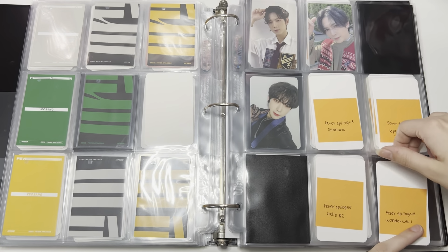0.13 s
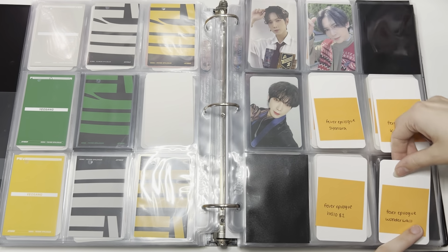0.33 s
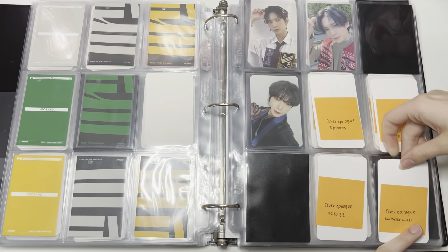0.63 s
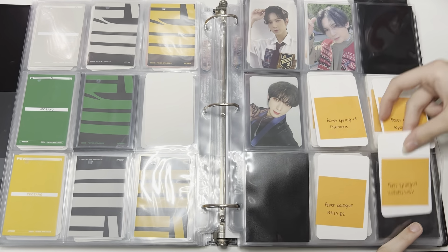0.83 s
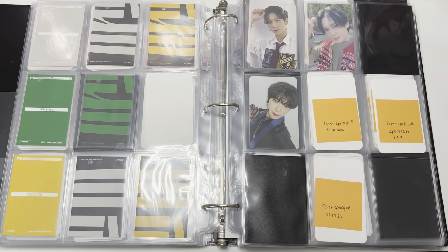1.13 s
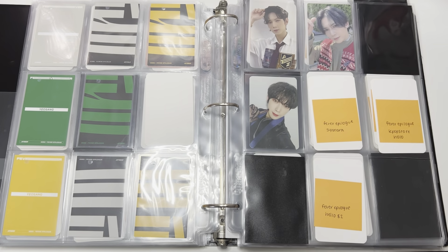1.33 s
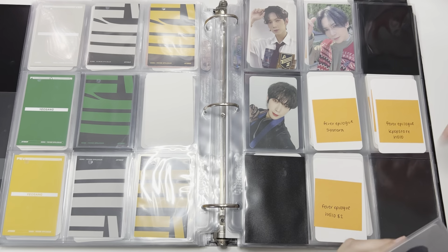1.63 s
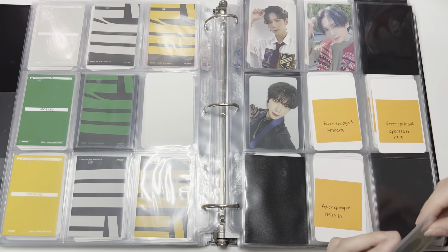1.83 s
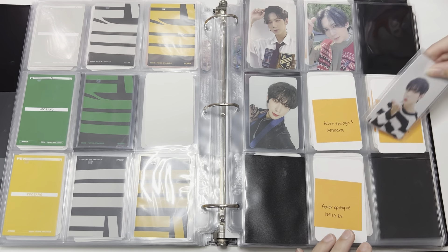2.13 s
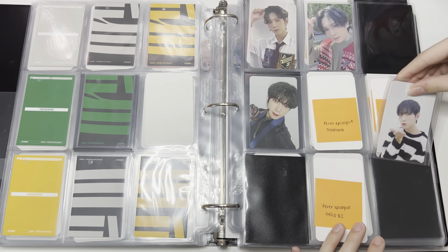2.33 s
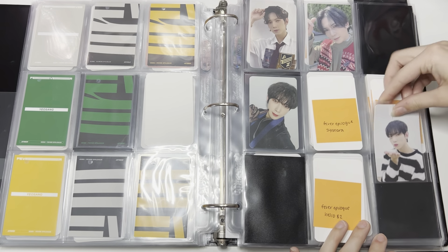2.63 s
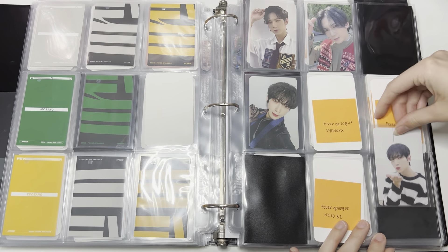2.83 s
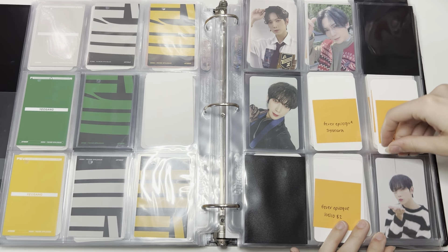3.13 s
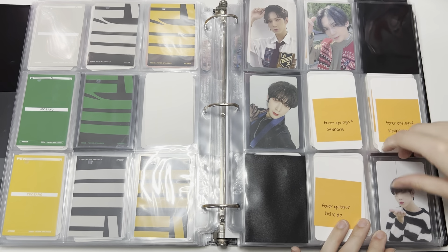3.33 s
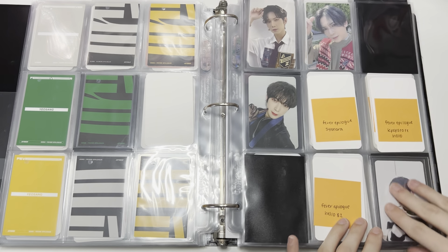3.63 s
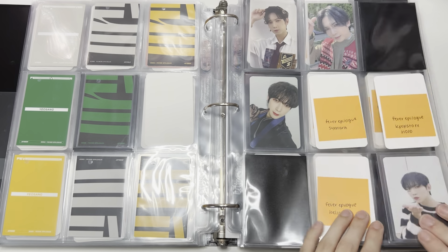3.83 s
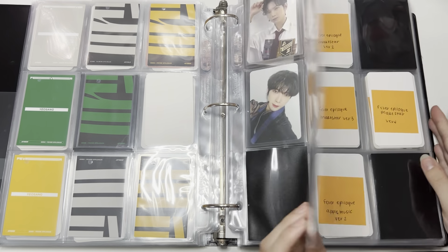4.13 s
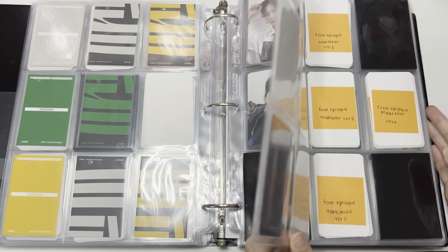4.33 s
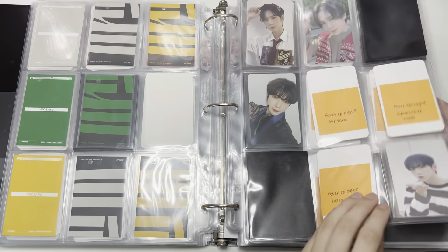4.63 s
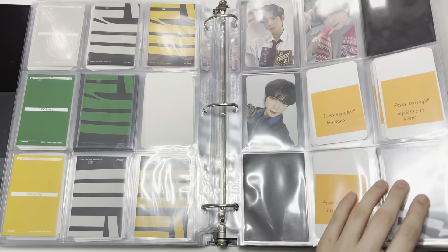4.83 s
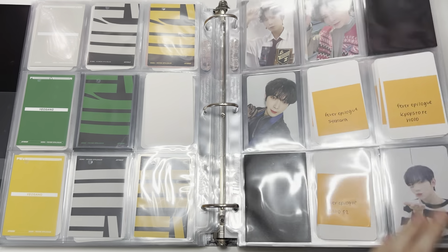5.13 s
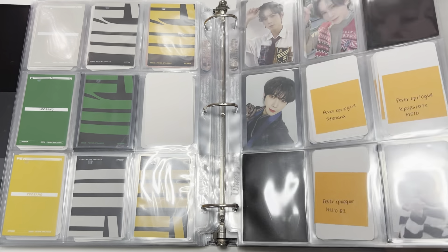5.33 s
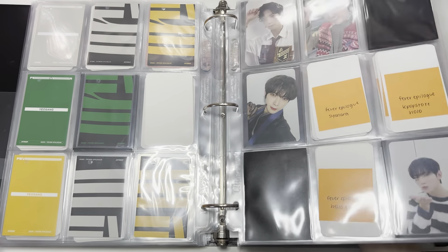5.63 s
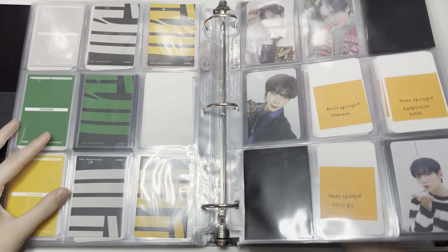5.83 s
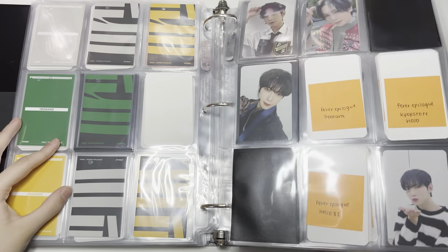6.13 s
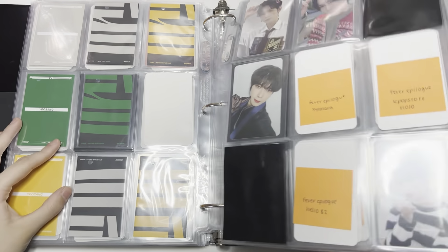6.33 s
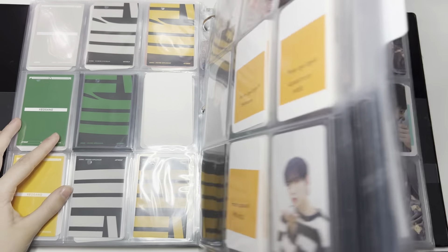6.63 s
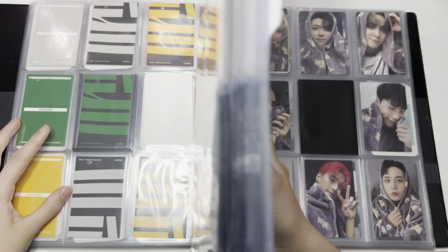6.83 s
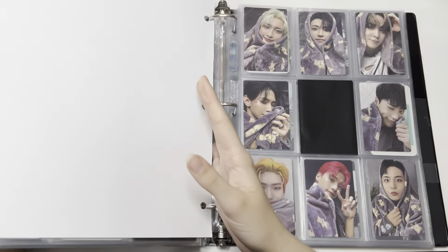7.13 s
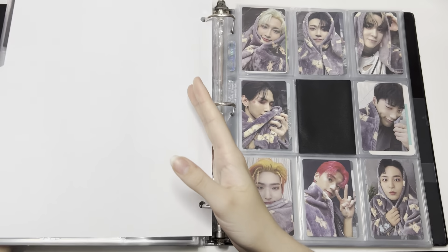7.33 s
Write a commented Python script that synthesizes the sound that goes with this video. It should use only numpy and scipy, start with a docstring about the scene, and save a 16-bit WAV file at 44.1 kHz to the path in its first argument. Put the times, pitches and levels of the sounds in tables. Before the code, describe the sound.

A quiet room with low building rumble and a faint sagging hum; close stereo microphones, handling slightly to the right. From 0 to 1.4 seconds a card is worked out of a plastic sleeve: dry scuffs, thin hiss, crisp little clicks and a hollow knock near 0.6. It is almost silent until two clicks at 2.2, then a faint slide and dull tap around 2.5 as another card goes in. Soft ticks and pocket pops run from 3.3 to 4.1. The page flexes with sharper crackles and hollow knocks at 4.1 to 4.7, then rustles lightly, with a pop near 5.65. Around 6.5 to 6.9 it lifts in dense crinkling, snaps and low fluttering. At about 7.2 it slaps down loudly, a quick patter with a falling whump of air and a low binder thud, followed by a softer bump at 7.35 and a last tap.

```python
"""Cards slide out of and into the plastic pockets of a ring binder on a desk in a quiet room.
Stick-slip friction makes them hiss and scuff; catching edges and buckling sleeves snap in noise bursts.
The loaded page crinkles as it bends and knocks on the pages below. At last it is turned over and slaps
down: a patter of impacts, a falling whump of squeezed air and the ringing modes of the binder.
Low rumble and hums of the building lie beneath, and the desk and room add echoes."""
import sys
import numpy as np
from scipy import signal
from scipy.fft import rfft, irfft, next_fast_len
from scipy.io import wavfile

SR = 44100
rng = np.random.default_rng(int(sys.argv[2]) if len(sys.argv) > 2 else 0)


def store_wav(level_fs):
    """Save 16-bit WAV to argv[1]."""
    pcm = np.round(np.clip(np.atleast_2d(level_fs), -1, 1) * 32767)
    wavfile.write(sys.argv[1], SR, pcm.T.astype(np.int16))


N = 330685
TIME = np.arange(N) / SR   # seconds
FFT_SIZE = next_fast_len(N + SR)
FREQS = np.maximum(np.fft.rfftfreq(FFT_SIZE, 1 / SR), 1)   # Hz
CUTOFF_HZ = 15900

# All levels are relative: filters, mixing gains and echoes follow.
# Spectrum of the building's rumble. Each row: frequency in Hz, level in dB per Hz.
ROOM_TONE_SPECTRUM = [(25, -22), (38, -22), (50, -4.5), (66, -9), (90, -9.5), (160, -11), (260, -19.5),
                      (340, -25), (450, -27), (800, -29.5), (1100, -46.5), (2500, -50), (9000, -65.5),
                      (16000, -51.5)]
ROOM_TONE_DB = -55.5
# Likeness of the rumble at the two microphones. Each row: frequency in Hz, correlation from 0 to 1.
RUMBLE_LIKENESS = [(50, 0.97), (200, 0.77), (450, 0.47), (900, 0.017)]
# Low hum that sags in pitch. Each row: time in seconds, frequency in Hz, level in dB.
SAGGING_HUM = [(0, 80, -65.5), (2.2, 77.73, -59), (4.2, 75.5, -62), (4.95, 74.06, -65),
               (5.45, 73.05, -50.5), (6.2, 72.16, -54), (6.7, 72.3, -72)]
# Faint steady hums. Each row: frequency in Hz, level in dB.
STEADY_HUMS = [(120, -66.5), (163, -69)]

# A card or page slides over plastic. Each row: start in seconds, length in seconds, level in dB.
SLIDES = [(0.1, 0.1, -74.5), (0.23, 0.041, -65.5), (0.39, 0.021, -65.5), (0.595, 0.057, -60),
          (0.74, 0.067, -58), (0.83, 0.14, -59), (1.165, 0.2, -65.5), (1.245, 0.018, -60),
          (2.29, 0.017, -65.5), (2.53, 0.29, -71), (3.0, 0.19, -70), (3.89, 0.077, -69.5),
          (4.085, 0.026, -65.5), (4.17, 0.038, -65), (4.56, 0.21, -72.5), (4.95, 0.1, -71.5),
          (5.07, 0.086, -66), (5.28, 0.093, -71.5), (5.66, 0.38, -72.5), (6.19, 0.071, -68.5),
          (6.52, 0.43, -77), (7.03, 0.062, -69)]
# Fingers rest on the page and brush it. Each row: start in seconds, length in seconds, level in dB.
TOUCHES = [(2.368, 0.74, -74.5), (3.3, 1, -80), (4.51, 0.696, -77), (5.29, 1.57, -74), (7.008, 0.51, -79.5)]
SLIDE_ATTACK_S, SLIDE_RELEASE_S = 0.035, 0.026   # time taken to rise or fall by 20 dB
# The sheet bends and crinkles. Each row: peak in seconds, 20 dB rise time in seconds, level in dB.
BENDS = [(0.14, 0.54, -74.5), (0.41, 0.082, -65.5), (0.635, 0.048, -68), (0.82, 0.32, -67.5),
         (2.23, 0.077, -77), (3.34, 0.15, -71), (4.095, 0.031, -63), (4.176, 0.022, -52),
         (4.625, 0.15, -61), (4.71, 0.22, -66.5), (5.04, 0.19, -68), (5.42, 0.66, -72.5),
         (5.67, 0.053, -60.5), (5.84, 0.32, -68.5), (6.28, 1, -70.5), (6.47, 0.25, -69), (6.62, 0.13, -54),
         (6.79, 0.11, -62), (7.065, 0.12, -59.5)]
# The lifted page sways. Each row: peak in seconds, 20 dB rise time in seconds, level in dB.
SWAYS = [(4.58, 0.46, -71), (5.02, 0.14, -65.5), (5.9, 1, -69), (6.25, 0.093, -64), (6.64, 0.12, -56.5),
         (6.8, 0.12, -54.5), (7.12, 0.2, -66)]
BEND_FALL, SWAY_FALL = 0.91, 1   # fall time as a multiple of the rise time
# Resonances of a loaded sleeve. Each row: frequency in Hz, width in Hz, gain in dB.
SLEEVE_RESONANCES = [(560, 39, -15), (1300, 86, -3), (1900, 300, 6.5), (3920, 120, -12), (5150, 250, -5)]
# Spectrum of sliding. Each row: frequency in Hz, level in dB per Hz.
SLIDE_SPECTRUM = [(200, -8), (700, 1), (1400, -2.5), (2400, 0), (4000, 5), (6000, 4.5), (8000, 2),
                  (10000, 0), (12500, 8.5), (16000, 3.5)]
# Spectrum of crinkling. Each row: frequency in Hz, level in dB per Hz.
CRINKLE_SPECTRUM = [(150, 0), (400, -1.5), (1000, 9), (2100, 9.5), (3000, 3.5), (5000, 0.5), (12000, -8)]
# Spectrum of swaying. Each row: frequency in Hz, level in dB per Hz.
SWAY_SPECTRUM = [(80, 4.5), (200, 9.5), (400, 8.5), (750, 0), (1200, -32)]

# Reverberation of the room. Each row: frequency in Hz, time to decay by 60 dB in seconds.
ROOM_T60 = [(150, 0.16), (1000, 0.31), (4000, 0.42), (8000, 0.24), (16000, 0.071)]

# A stiff edge catches and clicks. Each row: start in seconds, pitch in Hz, level in dB, sharpness in dB.
CLICKS = [(0.068, 1260, -56.5, -8), (0.096, 2580, -55, 2), (0.16, 1910, -63, 6), (0.185, 2400, -52.5, -3),
          (0.389, 1380, -62, -5), (0.569, 2070, -60.5, -10), (0.595, 1450, -55, -4.5),
          (0.785, 1700, -54, -1), (0.849, 1270, -50, -1), (0.944, 1600, -55.5, 12),
          (1.163, 2430, -56.5, 4.5), (1.35, 3030, -53.5, 2.5), (1.848, 2850, -72.5, 7),
          (2.123, 2820, -68, 9.5), (2.203, 2270, -55.5, -3), (2.212, 3020, -53, 2.5),
          (2.701, 2590, -62, -3.5), (3.331, 1500, -56.5, 4), (3.555, 2600, -61, 8),
          (3.932, 1690, -60.5, 11), (3.954, 2180, -57.5, 10), (4.098, 1560, -64, 9),
          (4.166, 1270, -51.5, -3), (4.586, 1220, -47, -8.5), (4.667, 1360, -54, 2.5),
          (4.845, 2030, -58, -4), (5.097, 1190, -56.5, -4), (5.5, 1500, -67, 5), (6.513, 1410, -57.5, -7),
          (6.547, 1700, -57, 1.5), (6.564, 1900, -52, -5), (6.601, 1380, -42.5, -4.5),
          (6.692, 1720, -52.5, 1), (6.778, 1810, -58, 8.5), (7.143, 1300, -47.5, -2.5),
          (7.2005, 1130, -34, 2), (7.354, 1990, -62, 0)]
# A pocket buckles with a dull pop. Each row: start in seconds, pitch in Hz, level in dB, depth in dB.
BUCKLES = [(0.614, 1200, -60, 6.5), (2.457, 1900, -63, 2), (3.508, 1800, -66.5, 0.5),
           (3.602, 2250, -70, -1), (3.706, 1680, -60, 5), (3.728, 1860, -64, -1.5),
           (3.838, 1450, -58.5, -6), (3.983, 1360, -62, 3.5), (4.07, 1330, -64.5, 2.5),
           (4.089, 1500, -66, 5.5), (4.11, 1550, -66, 4), (4.541, 1300, -61.5, 5), (4.554, 1150, -59, 4.5),
           (4.68, 1600, -62, 4), (4.87, 2050, -63, -1), (5.002, 2080, -61, 2.5), (5.015, 1500, -71, 6),
           (5.643, 1500, -55.5, 1), (5.663, 2140, -57, 1), (5.872, 1060, -63.5, 9), (5.964, 1610, -59, 4.5),
           (6.583, 1770, -49.5, 0.5), (6.624, 1480, -51.5, -2), (6.652, 1500, -48.5, -19),
           (6.756, 1810, -54, -16), (6.783, 1410, -58, -5), (6.826, 1480, -54, -11), (6.841, 1500, -53, 1),
           (6.85, 1900, -58.5, 0.5), (7.425, 1160, -57, 2.5)]
# The four ranges a snap excites; band() limits the top edge.
# Each row: low edge in Hz, high edge in Hz, time to decay by 60 dB in seconds, gain in dB.
SNAP_RANGES = [(203, 946, 0.024, -2.5), (1070, 2360, 0.0075, -2.5), (2500, 6070, 0.011, -5.5),
               (9900, 28400, 0.0083, -5)]
# A click in each range. Each row: level in dB, dB gained per dB of sharpness.
CLICK_COLOUR = [(-5.5, -1.03), (-5.5, -0.02), (-3, 0), (-1.5, 1)]
# A buckle in each range. Each row: level in dB, dB gained per dB of depth.
BUCKLE_COLOUR = [(2, 1.5), (3.5, 0), (-10, 0.5), (-9, -0.5)]

# A fingertip or the bending page knocks hollowly on the pages below.
# Each row: start in seconds, nominal pitch in Hz, level in dB.
KNOCKS = [(0.097, 235, -49), (0.615, 630, -42), (2.464, 425, -51), (3.606, 432, -47.5), (3.712, 486, -47.5),
          (4.112, 202, -46.5), (4.541, 610, -44), (4.555, 767, -37.5), (5.532, 603, -43), (5.874, 363, -44),
          (6.12, 339, -47), (6.579, 302, -46), (6.624, 526, -40.5), (6.657, 260, -47), (6.743, 579, -44),
          (6.781, 540, -39.5), (6.809, 445, -40.5), (6.839, 330, -39.5), (7.425, 315, -38)]
# Plastic scuffs over plastic and sings; the two shortest bursts, near 3.56 s, belong to a bright click.
# Each row: peak in seconds, half-length in seconds, pitch at the peak in Hz, level in dB,
# glide in octaves per second.
SCUFFS_AND_CLICK = [(0.603, 0.04, 4000, -60.5, -4.5), (0.84, 0.029, 5730, -59, 1.5),
                    (0.942, 0.012, 7200, -60.5, 0.5), (2.716, 0.28, 7200, -78.5, -2),
                    (3.145, 0.068, 6150, -72, -2.5), (3.557, 0.0039, 2530, -59.5, -6),
                    (3.558, 0.0044, 12600, -47, 0), (4.755, 0.056, 2680, -67.5, 2.5),
                    (5.389, 0.089, 1960, -71, 0), (6.79, 0.065, 1780, -62, -1.5)]
# Spectrum of stray sleeve ticks. Each row: frequency in Hz, level in dB per Hz.
STRAY_SPECTRUM = [(300, 8), (1500, -5), (3000, 1.5), (7000, -17), (13000, 4)]

# The page touches crisply, lands flat, then its loose edge follows. Each row: full contact in seconds,
# 20 dB rise time in seconds, time to decay by 60 dB in seconds, level in dB, treble gain in dB.
LANDINGS = [(7.17, 0.0044, 0.05, -47, 13), (7.181, 0.0044, 0.04, -29, 5.5), (7.19, 0.0047, 0.027, -23, 2),
            (7.196, 0.0074, 0.033, -24, -19), (7.203, 0.0089, 0.039, -21, -2),
            (7.249, 0.029, 0.064, -33.5, 0)]
# Spectrum of the slap. Each row: frequency in Hz, level in dB per Hz.
SLAP_SPECTRUM = [(60, 2), (250, 1.5), (450, 1.5), (750, 0), (1100, -2), (1500, -11), (2100, -9.5),
                 (3200, -16), (5500, -26), (8000, -23.5), (16000, -30.5)]
# Resonances of the stacked pages. Each row: frequency in Hz, width in Hz, gain in dB.
STACK_RESONANCES = [(686, 130, -4.5), (893, 60, -9), (1070, 160, -9), (2140, 200, -2.5)]
# Air squeezed from under the page.
WHUMP_S, WHUMP_RISE_S, WHUMP_T60_S, WHUMP_DB = 7.183, 0.022, 0.21, -26.5
WHUMP_START_HZ, WHUMP_END_HZ, WHUMP_FALL_S = 283, 58.6, 0.0172
# Blows on the binder. Each row: start in seconds, level in dB, contact time in seconds.
THUDS = [(7.226, -25.5, 0.0042), (7.351, -30, 0.015)]
# Modes of the binder on the desk. Each row: frequency in Hz, level in dB, 60 dB decay time in seconds.
BINDER_MODES = [(56, 0.5, 0.41), (79.3, -3, 0.32), (116, -10, 0.26), (182.4, -2.5, 0.224), (232, 2.5, 0.13),
                (355, -14, 0.31)]

# Stereo balance of hands and building. Each row: frequency in Hz, left minus right in dB.
HANDS_LEAN = [(100, -2), (700, -0.5), (1300, -3), (2300, -2.5), (4000, -9), (5500, -10.5), (7500, -3)]
# Stereo balance of the landing. Each row: frequency in Hz, left minus right in dB.
LANDING_LEAN = [(350, -1.5), (750, 1.5), (1300, 0), (2400, 0), (4400, -5), (7500, -2)]
# Phase between the microphones. Each row: frequency in Hz, lead of the left in radians.
LEFT_PHASE = [(300, 0), (900, -0.91), (5000, 0.04), (7200, 0.7), (8300, 0.58), (9000, 4), (10000, 3),
              (11400, 6), (12300, 5), (14000, 10), (16000, 10.5)]


def from_db(db):
    """Logarithmic level: convert decibels to an amplitude gain."""
    return np.exp(np.maximum(db, -300) * (np.log(10) / 20))


def rms_one(x):
    """Mean power: scale a signal to unit rms."""
    return x / np.sqrt(np.mean(x ** 2) + 1e-20)


def at_hz(points, hz):
    """Logarithmic pitch: interpolate a table along log frequency."""
    f, value = np.transpose(points)
    return np.interp(np.log(hz), np.log(f), value)


def shaped(x, response):
    """Linear filtering: multiply the spectrum by a frequency response."""
    return irfft(rfft(x, FFT_SIZE) * response, FFT_SIZE)[..., :N]


def coloured(x, spectrum):
    """Spectral colouring: filter by a table of levels and scale to unit rms."""
    return rms_one(shaped(x, from_db(at_hz(spectrum, FREQS))))


def band(x, low, high):
    """Causal band-pass: keep one range of frequencies."""
    edges = [low, min(high, .45 * SR)]
    sos = signal.butter(3, edges, "band", fs=SR, output="sos")
    return signal.sosfilt(sos, x + 1e-18)


def resonance(x, hz, width):
    """Damped resonance: one peak of unit gain, narrower when damping is lighter."""
    return signal.lfilter(*signal.iirpeak(hz, hz / width, fs=SR), x)


def drift(rate):
    """Random fluctuation: unit-spread values, this many per second, joined by straight lines."""
    knots = rng.standard_normal(N // 40)
    return np.interp(TIME * rate, np.arange(len(knots)), knots)


def glided(x, octaves):
    """Varying playback speed: reading faster raises pitch and advances time together."""
    return np.interp(np.cumsum(2 ** octaves), np.arange(len(x)), x, period=len(x))


def room_tone(drone_hz, drone_db, waver_hz):
    """Partly correlated noise: the building's steady rumble, with a drone wavering by slow modulation."""
    mid, side = rng.standard_normal((2, N))
    alike = np.clip(at_hz(RUMBLE_LIKENESS, FREQS), 0, 1)
    pair = shaped(mid, np.sqrt(1 + alike)) + shaped(side, np.sqrt(1 - alike)) * [[1], [-1]]
    rumble = coloured(pair, ROOM_TONE_SPECTRUM)
    turn = 2 * np.pi * drone_hz * TIME
    drone = rms_one(drift(waver_hz) * np.sin(turn) + drift(waver_hz) * np.cos(turn))
    return from_db(ROOM_TONE_DB) * rumble + from_db(drone_db) * drone


def hum():
    """Sinusoidal tones: one low hum sags in pitch and swells while the others hold."""
    s, hz, db = np.transpose(SAGGING_HUM)
    phase = 2 * np.pi * np.cumsum(np.interp(TIME, s, hz)) / SR
    sagging = from_db(np.interp(TIME, s, db)) * np.sin(phase)
    steady = sum(from_db(tone_db) * np.sin(2 * np.pi * tone_hz * TIME)
                 for tone_hz, tone_db in STEADY_HUMS)
    return np.sqrt(2) * (sagging + steady)   # peak from rms


def slips(per_s, spread_db, clump_db, clump_rate):
    """Stick-slip: random tiny releases of uneven size, whose level rises and falls in clumps."""
    out = np.zeros(N)
    draw = rng.random(N) * SR / per_s
    clumps = rng.standard_normal(N // 40)
    at = np.flatnonzero(draw < 1)
    chance = 2 * draw[at] - 1   # gives each slip its sign and size
    size_db = spread_db * np.minimum(-np.log(np.abs(chance) + 1e-12), 4)
    clump = np.interp(TIME[at] * clump_rate, np.arange(len(clumps)), clumps)
    out[at] = np.sign(chance) * from_db(size_db + clump_db * clump)
    return out


def strokes(rows):
    """Friction envelope: each stroke takes hold quickly, holds and lets go; powers add."""
    power = np.zeros(N)
    for s, length, db in rows:
        near = slice(max(int((s - .5) * SR), 0), int((s + length + .5) * SR))
        before = (s - TIME[near]) / SLIDE_ATTACK_S
        after = (TIME[near] - s - length) / SLIDE_RELEASE_S
        outside = np.maximum(np.maximum(before, after), 0)
        power[near] += from_db(db - 20 * outside) ** 2
    return np.sqrt(power)


def swells(rows, fall):
    """Strain envelope: each builds by 20 dB over its rise time, then relaxes; powers add."""
    power = np.zeros(N)
    for s, rise, db in rows:
        near = slice(max(int((s - 1) * SR), 0), int((s + 1) * SR))
        away = np.maximum(s - TIME[near], (TIME[near] - s) / fall) / rise
        power[near] += from_db(db - 20 * away) ** 2
    return np.sqrt(power)


def sleeve(x, wander_octaves, wander_rate):
    """Plate resonance: sheet and cards add broad peaks, which wander as the pocket opens and closes."""
    rings = sum(from_db(db) * resonance(x, hz, width) for hz, width, db in SLEEVE_RESONANCES)
    return x + glided(rings, wander_octaves * drift(wander_rate))


def crackles(per_s, cycles):
    """Local buckling: a bending sheet pops in many spots, each ringing briefly at its own pitch."""
    pops = np.zeros(N)
    for hz in np.geomspace(550, 4500, num=9):
        spot = slips(per_s=per_s, spread_db=2.5, clump_db=-0.5, clump_rate=0.97)
        pops += resonance(spot, hz, hz / cycles) / np.sqrt(hz)
    return pops * from_db(5.1 * drift(55))   # uneven level


def rubbing():
    """Friction noise: fine slips hiss as a card slides, coarser ones crinkle and rumble as the page bends."""
    fine = slips(per_s=3600, spread_db=1.7, clump_db=2.5, clump_rate=110)
    hiss = coloured(sleeve(fine, wander_octaves=0.16, wander_rate=9.2), SLIDE_SPECTRUM)
    crinkle = coloured(crackles(per_s=110, cycles=3), CRINKLE_SPECTRUM)
    coarse = slips(per_s=420, spread_db=2.5, clump_db=0.5, clump_rate=92)
    rumble = coloured(coarse, SWAY_SPECTRUM)
    sliding = strokes(SLIDES + TOUCHES) * hiss
    bending = swells(BENDS, BEND_FALL) * crinkle
    swaying = swells(SWAYS, SWAY_FALL) * rumble
    return from_db(-1.0) * sliding + bending + from_db(8.0) * swaying


def room(x, tail_db, desk_db, desk_t60):
    """Reverberation: quick reflections off desk and binder, and a tail whose decay depends on frequency."""
    t = TIME[:SR // 2]
    edges = np.geomspace(100, 16000, num=8)
    white = rng.standard_normal((3, 2, len(t)))   # independent left and right
    tail = 0
    for k, (low, high) in enumerate(zip(edges, edges[1:])):
        t60 = at_hz(ROOM_T60, np.sqrt(low * high))
        tail = tail + band(white[k % 2], low, high) * from_db(-60 * t / t60)
    tail = tail * (t > .005)
    desk = band(white[2], 386, 8000) * from_db(-60 * t / desk_t60) * (t > .0005)
    echo = (from_db(tail_db) * rms_one(tail) + from_db(desk_db) * rms_one(desk)) / np.sqrt(len(t))
    return signal.fftconvolve(np.atleast_2d(x), echo, axes=1)[:, :N]


def voiced(rows, colour):
    """Spectral balance: give each snap its time, pitch and level in every range."""
    return [(s, hz, *(db + offset + slope * amount for offset, slope in colour))
            for s, hz, db, amount in rows]


def snaps(rattle_db, rattle_stretch, rise_share, width_hz, dull_db, apart_db):
    """Impulsive release: noise bursts decay range by range around a pitch, and the card rattles faintly."""
    out, t = np.zeros((2, N + SR)), TIME[:SR // 8]
    for s, hz, *levels in voiced(CLICKS, CLICK_COLOUR) + voiced(BUCKLES, BUCKLE_COLOUR):
        shared, *own = rng.standard_normal((3, len(t)))
        noise = shared + from_db(apart_db) * np.array(own)   # the sheet radiates differently to each side
        at = int(s * SR)
        for k, (low, high, t60, gain_db) in enumerate(SNAP_RANGES):
            age = t / t60
            rattle = from_db(rattle_db - 60 * age / rattle_stretch)
            decay = from_db(-60 * age) + rattle
            rise = 1 - np.exp(-age / rise_share)
            burst = band(noise * decay * rise, low, high)
            if k == 1:   # this range rings at the snap's pitch
                burst = resonance(burst, hz, width_hz) + from_db(dull_db) * burst
            burst = burst / burst[:, :SR // 100].std()
            out[:, at:at + len(t)] += from_db(levels[k] + gain_db) * burst
    return out[:, :N]


def knocks(cycles, sag, overtone, overtone_db):
    """Damped oscillation: the pages lose 60 dB in a set number of cycles, sagging in pitch as they give."""
    out, t = np.zeros(N + SR), TIME[:SR // 8]
    for s, hz, db in KNOCKS:
        age = t * hz / cycles
        bent_hz = hz * (1 + sag * (np.exp(-3 * age) - .5))
        turn = 2 * np.pi * np.cumsum(bent_hz) / SR
        ring = np.sin(turn) + from_db(overtone_db - 16 * age) * np.sin(overtone * turn)
        rise = 1 - np.exp(-t * hz * 2)
        out[int(s * SR):][:len(t)] += from_db(db - 60 * age) * rise * ring
    return out[:N]


def scuffs_and_click(relative_width):
    """Resonant bursts: slips in a narrow gliding band sing as plastic scuffs, or brighten one click."""
    out = np.zeros(N)
    grain = slips(per_s=2900, spread_db=4.0, clump_db=6.5, clump_rate=46)
    for s, half_length, hz, db, glide in SCUFFS_AND_CLICK:
        span = np.abs(TIME - s) < half_length
        sung = band(grain[span], hz / (1 + relative_width), hz * (1 + relative_width))
        gliding = rms_one(glided(sung, glide * (TIME[span] - s)))
        out[span] += from_db(db) * gliding * np.hanning(len(sung))
    return out


def stray_ticks(per_s, spread_db, t60, level_db):
    """Random impulses: sleeves tick faintly, as decaying noise, while fingers are on the page."""
    t = TIME[:SR // 30]
    tick = rms_one(rng.standard_normal(len(t)) * from_db(-60 * t / t60))
    ticks = signal.fftconvolve(slips(per_s, spread_db, 0, 1), tick)[:N]
    return from_db(level_db) * strokes(TOUCHES) * coloured(ticks, STRAY_SPECTRUM)


def page_slap(apart_db, treble_hz):
    """Distributed impact: pocket after pocket meets and rings the stack, its upper patter differing by side."""
    shared, *own = [slips(per_s=12000, spread_db=1.0, clump_db=1.8, clump_rate=230) for _ in range(3)]
    patter = shared + from_db(apart_db) * band(np.array(own), 510, CUTOFF_HZ)
    rings = sum(from_db(db) * resonance(patter, hz, width) for hz, width, db in STACK_RESONANCES)
    patter = coloured(patter + rings, SLAP_SPECTRUM)
    treble = shaped(patter, 1 / (1 + (treble_hz / FREQS) ** 6))
    slap = np.zeros((2, N))
    for s, rise, t60, db, treble_db in LANDINGS:
        away_db = np.maximum(20 * (s - TIME) / rise, 60 * (TIME - s) / t60)
        slap += from_db(db - away_db) * (patter + (from_db(treble_db) - 1) * treble)
    return slap


def whump():
    """Air cushion: the squeezed layer collapses, giving a decaying tone whose pitch falls fast."""
    t = np.maximum(TIME - WHUMP_S, 0)
    hz = WHUMP_END_HZ + (WHUMP_START_HZ - WHUMP_END_HZ) * np.exp(-t / WHUMP_FALL_S)
    tone = np.sin(2 * np.pi * np.cumsum(hz * (t > 0)) / SR)
    return from_db(WHUMP_DB - 60 * t / WHUMP_T60_S) * (1 - np.exp(-t / WHUMP_RISE_S)) * tone


def binder_thud():
    """Modal excitation: the page's weight rings the binder, and slower contact favours the lowest modes."""
    out = np.zeros(N)
    for s, db, contact in THUDS:
        t = TIME[TIME >= s] - s
        modes = np.zeros(len(t))
        for hz, mode_db, t60 in BINDER_MODES:
            softening = (1 + (hz * contact / 2) ** 2) ** 2
            modes += from_db(db + mode_db - 60 * t / t60) * np.sin(2 * np.pi * hz * t) / softening
        out[N - len(t):] += modes * (1 - np.exp(-t / contact))
    return out


def placed(x, lean):
    """Interchannel level difference: split each frequency's balance evenly between the two sides."""
    return shaped(x, from_db(np.array([[.5], [-.5]]) * at_hz(lean, FREQS)))


def scene():
    """Superposition: hands and building lean right; the landing is more central, its treble to the right."""
    hands = rubbing() + scuffs_and_click(relative_width=0.27)
    hands = hands + snaps(rattle_db=-16.5, rattle_stretch=9.4, rise_share=0.029,
                          width_hz=720, dull_db=-28, apart_db=3.0)
    hands = hands + knocks(cycles=20.6, sag=0.32, overtone=1.56, overtone_db=-14.5)
    hands = hands + stray_ticks(per_s=21, spread_db=0.0, t60=0.0078, level_db=-8.0)
    hands = hands + room(hands, tail_db=-8.0, desk_db=-8.5, desk_t60=0.014)
    landing = page_slap(apart_db=-3.0, treble_hz=1500) + whump() + binder_thud()
    landing = landing + room(landing, tail_db=-11.5, desk_db=-17.5, desk_t60=0.015)
    building = room_tone(drone_hz=58.3, drone_db=-55, waver_hz=7) + hum()
    return placed(hands + building, HANDS_LEAN) + placed(landing, LANDING_LEAN)


def record(dry):
    """Microphone coupling: around 7 kHz the left gives way to a phase-shifted right; the top is cut."""
    shared = np.clip((FREQS - 6500) / 1200, 0, 1)
    left = shaped(dry[0], 1 - shared) + shaped(dry[1], shared)
    left = shaped(left, np.exp(1j * at_hz(LEFT_PHASE, FREQS)))
    low_pass = signal.ellip(10, .2, 70, CUTOFF_HZ, fs=SR, output="sos")   # ripple and stop-band in dB
    return signal.sosfilt(low_pass, np.array([left, dry[1]]))


dry = scene()
out = record(dry)
store_wav(out)
```